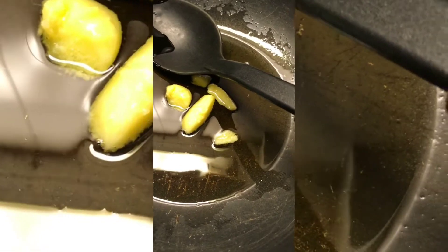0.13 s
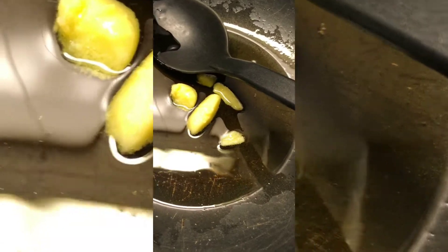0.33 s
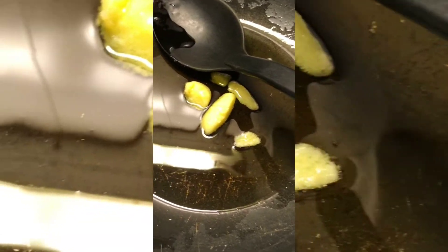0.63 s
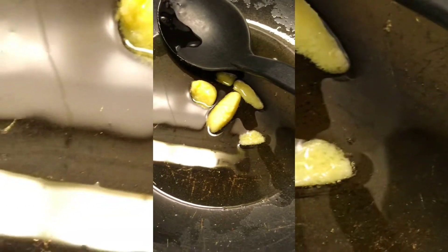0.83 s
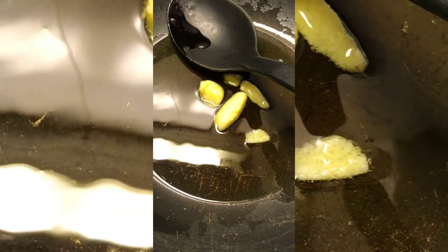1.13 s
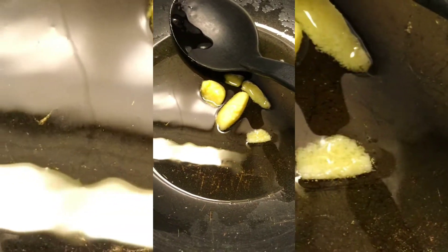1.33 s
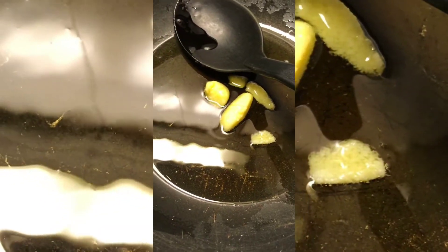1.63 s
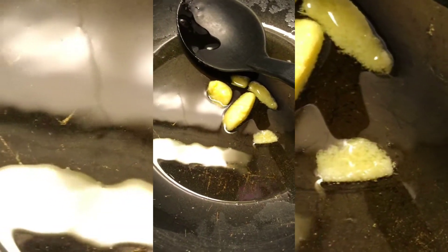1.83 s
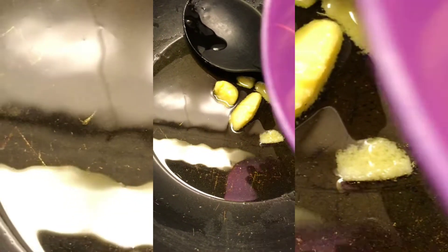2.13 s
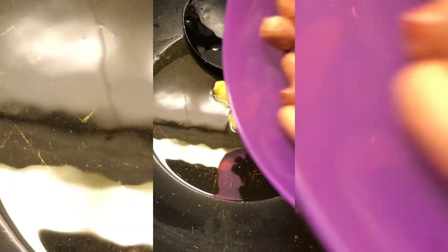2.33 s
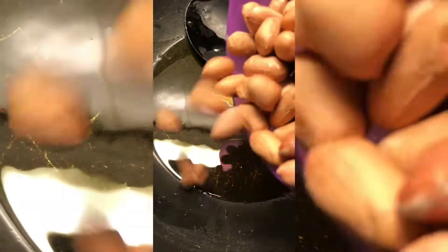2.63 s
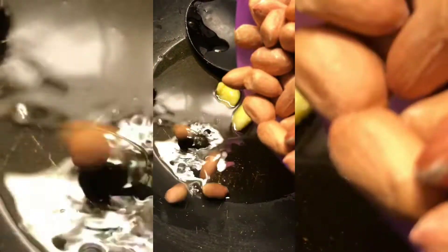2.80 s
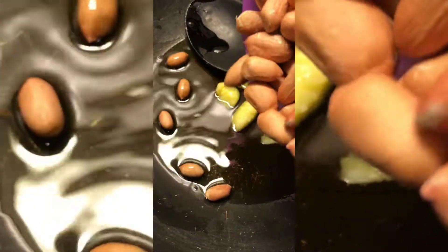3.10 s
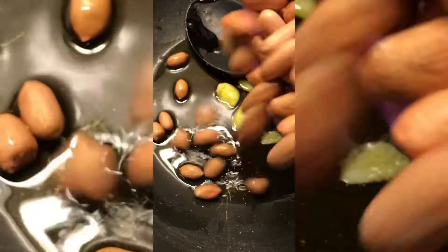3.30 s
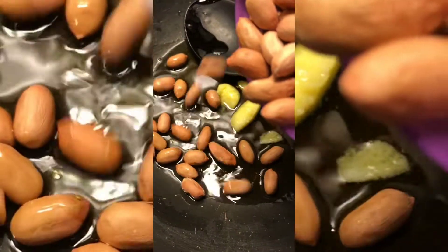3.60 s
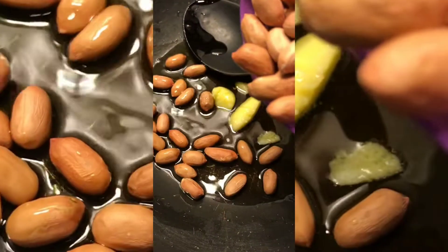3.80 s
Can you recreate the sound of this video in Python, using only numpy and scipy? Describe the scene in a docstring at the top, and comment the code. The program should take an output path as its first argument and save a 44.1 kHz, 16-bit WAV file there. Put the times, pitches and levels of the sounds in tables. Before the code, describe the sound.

Peanuts rattle sharply into a pan, a first scattered handful and then a denser one, after brief dry tumbling in a plastic bowl; faint butter crackle comes earlier, with constant low hum, close microphone, small room.

```python
"""Raw peanuts drop, in two handfuls, from a plastic bowl into a pan with a film of melted butter.
Each nut is a snap, a short noise knock, a clack and the decaying modes of pan or bowl, in a small kitchen.
Skins rustle in the bowl as dense filtered grains; a few very short high pings fall among the landings.
A low motor hum, sine lines in a rush of air, runs throughout.
Early on the butter gives a faint crackle of noise bursts, with a thin sizzle of narrow-band hiss."""
import sys
import numpy as np
from scipy import signal
from scipy.fft import rfft, irfft
from scipy.io import wavfile

SR = 44100
rng = np.random.default_rng(int(sys.argv[2]) if len(sys.argv) > 2 else 0)


def wav_out(sig):
    """Save sig, one row per channel (or a flat mono array), as 16-bit PCM at SR to the path in sys.argv[1]."""
    wavfile.write(sys.argv[1], SR, np.round(np.clip(np.atleast_2d(sig).T, -1, 1) * 32767).astype(np.int16))


N = 174195

# motor hum lines: pitch_hz, level_rms_db (before the waver)
HUM_LINES = [(99.8, -39.5), (46.3, -60.5), (135.2, -55.5), (213.3, -56)]
# spectrum of the motor's rush of air: frequency_hz, relative_level_db
AIR_COLOUR = [(22, -25), (38, -11), (52, -3), (90, 4.5), (140, 2.5), (168, -6.5), (210, -2.5), (260, -7.5),
              (350, -2), (420, -15.5), (490, -25), (635, -6), (740, -24), (930, -10), (1120, -19.5),
              (1350, -20), (2000, -27), (3200, -29.5), (4500, -38.5), (6000, -41), (7500, -46.5),
              (9000, -45), (10500, -49), (15500, -46.5)]
# sizzle swells: middle_s, length_s, centre_hz, rms_at_crest_db
SIZZLES = [(0.596, 1, 4760, -67.5), (.752, .35, 9200, -77)]
# butter crackles: start_s, onset_rms_db, t60_s
CRACKLES = [(.233, -37.5, 0.028), (0.2403, -38.5, 0.025), (0.2433, -36, 0.05), (0.2668, -42, 0.07),
            (0.2964, -42.5, 0.025), (0.3, -44.5, 0.076)]
# crackle spectrum: frequency_hz, relative_level_db
CRACKLE_COLOUR = [(700, 1), (1350, 15.5), (2000, 0), (3100, 8), (4600, 1), (5800, 11), (7500, 3), (9000, 6),
                  (10300, -1), (12000, 4), (15500, -2)]
# level of nuts rubbing in the bowl: time_s, level_db
RUSTLE_LEVEL = [(2.28, -69), (2.32, -47), (2.45, -40.5), (2.58, -39), (2.68, -48), (2.87, -68),
                (2.99, -43.5), (3.08, -55), (3.169, -54), (3.22, -46.5), (3.3, -47.5), (3.5, -61),
                (3.7, -45), (3.95, -61)]
# rustle spectrum: frequency_hz, relative_level_db
RUSTLE_COLOUR = [(480, -7), (1000, 8), (1600, -0.5), (2800, -8.5), (5000, -7.5), (7500, -18.5), (9000, -19),
                 (10400, -23), (12500, -19.5), (16000, -22)]
# four frequency registers: low_hz, high_hz
REGISTERS_HZ = [(500, 800), (850, 2800), (2800, 7500), (7500, 16500)]
# nominal decay of the knock of nut and vessel, one per register: t60_s
KNOCK_T60_S = [0.035, 0.021, 0.032, 0.041]
# nuts against the plastic bowl: start_s, thud_db, ring_db, clack_db, top_db, length_ratio (1 = free knock)
TUMBLES = [(2.3583, -50, -28.5, -44, -70, 0.2), (2.369, -42, -30.5, -57, -82, 0.75),
           (2.434, -44, -37, -49, -62, 0.63), (2.467, -32.5, -31.5, -44, -51, 1.4),
           (2.4884, -26.5, -21, -17.5, -34, 0.8), (2.511, -36, -35, -34, -56, 0.69),
           (2.5454, -40, -26, -27.5, -47, 0.53), (2.5486, -24.5, -22, -28, -39.5, 0.43),
           (2.556, -37, -25.5, -29.5, -45, 1.3), (2.577, -33, -28, -32, -47, 0.51),
           (2.586, -30, -29, -37, -59, 0.47), (2.5979, -30, -26.5, -29, -43, 0.73),
           (2.6016, -40, -26, -32, -58, 1.2), (2.618, -33, -25.5, -31.5, -49, 0.89),
           (2.641, -32, -27, -31.5, -47, 0.69), (3.2359, -30.5, -22.5, -28.5, -43.5, 1.08),
           (3.324, -28, -20, -38, -55, 0.86)]
# bowl modes, nominal: pitch_hz, relative_level_db, t60_s
BOWL_MODES = [(673, 2.5, 0.042), (952.4, 2.5, 0.065), (1050, -9, 0.11), (1240, -5, 0.032),
              (1700, -4.5, 0.016), (2290, 1, 0.019), (3380, -13.5, 0.062), (3970, -16, 0.021)]
# bowl knock spectrum, nominal: frequency_hz, relative_level_db
BOWL_COLOUR = [(470, -5), (650, 0.5), (1100, 10), (1600, -4), (2600, -2.5), (4100, 0), (7500, -15.5),
               (9000, -20), (10500, -26), (15000, -49)]
# nuts into the pan: start_s, thud_db, ring_db, clack_db, top_db, clack_hz
LANDINGS = [(2.7083, -26.5, -21.5, -17, -30, 3975), (2.7415, -31.5, -35, -46, -47, 4300),
            (2.7593, -23.5, -11.5, -13.5, -23.5, 4160), (2.777, -39, -29, -51, -59, 2870),
            (2.8163, -26, -15.5, -20.5, -38, 4010), (2.827, -39, -49, -20.5, -47, 4000),
            (2.848, -50, -10, -14, -39, 3500), (2.8645, -47, -39, -32, -35, 5740),
            (2.882, -32, -45, -29, -37.5, 5200), (2.913, -31.5, -32, -25, -39.5, 5100),
            (2.9295, -34, -21.5, -21.5, -60, 4030), (2.963, -35.5, -55, -39, -41.5, 4560),
            (2.986, -39, -33, -33.5, -57, 4100), (3.3272, -45, -10, -15, -35, 4630),
            (3.333, -59, -13, -16.5, -32.5, 3160), (3.348, -39, -38, -35, -55, 3920),
            (3.368, -39, -10.5, -16, -34, 5670), (3.375, -44, -18, -17.5, -33, 5880),
            (3.386, -49, -24.5, -25, -52, 2600), (3.3977, -31, -10, -19, -38, 3280),
            (3.4316, -34, -13.5, -24.5, -35, 2840), (3.4685, -33.5, -38, -24, -30, 5600),
            (3.482, -45, -55, -31, -50, 5660), (3.497, -45, -27, -24, -33, 6270),
            (3.5003, -31, -9.5, -14.5, -30, 5460), (3.5097, -41, -9, -13, -31.5, 3300),
            (3.5215, -36, -16.5, -24.5, -47, 2770), (3.563, -58, -25, -38, -63, 2230),
            (3.5772, -45, -23, -24, -35, 4140), (3.59, -56, -31, -38, -56, 2410),
            (3.6108, -55, -24, -22.5, -42, 3970), (3.6535, -46, -24, -26, -35, 3970),
            (3.6828, -47, -25, -39.5, -67, 2980), (3.7155, -44, -20.5, -30.5, -61, 3030),
            (3.7651, -43, -17, -24.5, -62, 1230), (3.775, -36, -19.5, -31, -66, 2720)]
# pan modes, nominal: pitch_hz, relative_level_db, t60_s
PAN_MODES = [(631, -4, 0.055), (998.4, -16.5, 0.092), (1060, -18.5, 0.06), (1194, -4.5, 0.052),
             (1693, -2, 0.043), (1784, 3.5, 0.041), (2180, -6.5, 0.024), (2278, -13, 0.046),
             (2584, -11, 0.074), (2844, -10.5, 0.035), (3425, -13.5, 0.073), (4006, -5.5, 0.034),
             (4380, -2, 0.017), (5844, -6, 0.022)]
# pan knock spectrum, nominal: frequency_hz, relative_level_db
PAN_COLOUR = [(470, -8.5), (630, -0.5), (820, -29), (1200, 2.5), (1400, -5), (1750, 4), (2300, 3),
              (3400, 2.5), (4900, -3), (5800, -9), (7000, -10), (7700, -18.5), (9000, -9.5), (10400, -25.5),
              (12000, -18.5), (15000, -24)]
# short high pings: start_s, pitch_hz, peak_db
PINGS = [(2.7154, 12000, -13.5), (3.3978, 14750, -11.5), (3.469, 14200, -8)]

AIR_RMS_DB, HUM_WAVER_RMS, HUM_WAVER_HZ = -38.5, 0.3, 8
SIZZLE_WIDTH_HZ = 1600
GRAINS_PER_S, FLICKER_RMS_DB, FLICKER_HZ = 4000, 2.5, 60

# parts of a strike, relative to each other; the hit tables then set each register's level
SNAP_DB, KNOCK_DB, CLACK_DB = 16, 1, 4.5
CLACK_T60_S, BOWL_CLACK_HZ = 0.015, 3890  # T60 at length_ratio 1
STRIKE_S = 0.008  # a hit's register levels are the rms deviation over this first stretch
# random spread from hit to hit
MODE_SPREAD_DB, BODY_SPREAD_DB, DETUNE_RATIO, DAMPING_SPREAD_LOG = 2.5, 2, 0.013, 0.2
# as nuts pile up, the pan's modes sink by this share per second
LOADED_FROM_S, SAG_PER_S = 3.45, 0.13
# dull early echo off a nearby surface; its path changes with the spot struck
ECHO_S, ECHO_SPREAD_S, ECHO_CUT_HZ = 0.00277, 0.000416, 5800
PAN_ECHO_DB, BOWL_ECHO_DB = -7.5, -13.5  # before the dulling filter
PING_T60_S = 0.0014

KITCHEN_LOW_T60_S, KITCHEN_TREBLE_T60_S = 0.35, 0.14
KITCHEN_LOW_DB, KITCHEN_TREBLE_DB = -12, -15  # before the split filter
KITCHEN_SPLIT_HZ, KITCHEN_BUILD_S = 2470, 0.0036
CLIP_TOP, CUTOFF_HZ = 0.97, 16000


def from_db(db):
    """Decibels to gain."""
    return 10 ** (np.asarray(db) / 20)


def rms_one(x):
    """Scale to rms 1."""
    return x / np.sqrt(np.mean(x ** 2) + 1e-20)


def spectrum_gain(points, size):
    """Gain per FFT bin, interpolated over log frequency from (Hz, dB) points."""
    hz, db = np.transpose(points)
    bins_hz = np.maximum(np.fft.rfftfreq(size, 1 / SR), 1)
    return from_db(np.interp(np.log(bins_hz), np.log(hz), db))


def coloured(x, points):
    """Give a noise the spectrum of (Hz, dB) points; rms 1."""
    return rms_one(irfft(rfft(x) * spectrum_gain(points, len(x)), len(x)))


def passed(x, hz, kind, order=3):
    """Butterworth filter."""
    return signal.sosfilt(signal.butter(order, hz, kind, fs=SR, output="sos"), x)


def dying(t, t60_s):
    """Exponential decay, 60 dB in t60_s."""
    return np.exp(-np.log(1000) * t / t60_s)


def add(out, start_s, sound):
    """Mix a sound in at start_s."""
    i = int(start_s * SR)
    out[i:i + len(sound)] += sound[:len(out) - i]


def slow(hz):
    """Random wander up to about hz; rms 1."""
    return rms_one(passed(rng.standard_normal(N), hz, "low", order=2))


def motor():
    """Slightly wavering hum lines in a steady rush of air."""
    t = np.arange(N) / SR
    out = from_db(AIR_RMS_DB) * coloured(rng.standard_normal(N), AIR_COLOUR)
    for hz, rms_db in HUM_LINES:
        waver = 1 + HUM_WAVER_RMS * slow(HUM_WAVER_HZ)
        line = np.sqrt(2) * np.sin(2 * np.pi * (hz * t + rng.random()))
        out += from_db(rms_db) * waver * line
    return out


def rustle():
    """Dry skins rub in dense tiny grains; each register catches and slips, flickering on its own."""
    t = np.arange(N) / SR
    hits = rng.random(N) < GRAINS_PER_S / SR
    grains = coloured(hits * rng.standard_normal(N), RUSTLE_COLOUR)
    scrape = np.zeros(N)
    for band_hz in REGISTERS_HZ:
        flicker = from_db(FLICKER_RMS_DB * slow(FLICKER_HZ))
        scrape += passed(grains, band_hz, "band") * flicker
    level_db = np.interp(t, *np.transpose(RUSTLE_LEVEL))
    return rms_one(scrape) * from_db(level_db)


def sizzle():
    """Narrow bands of hiss swell and fade."""
    out, t = np.zeros(N), np.arange(N) / SR
    for middle_s, length_s, hz, rms_db in SIZZLES:
        swell = np.cos(np.pi * np.clip((t - middle_s) / length_s, -0.5, 0.5))
        band_hz = (hz - SIZZLE_WIDTH_HZ / 2, hz + SIZZLE_WIDTH_HZ / 2)
        hiss = rms_one(passed(rng.standard_normal(N), band_hz, "band", order=2))
        out += from_db(rms_db) * swell * hiss
    return out


def butter_crackle():
    """A few tiny bright noise bursts, each decaying exponentially."""
    out, t = np.zeros(N), np.arange(SR // 10) / SR
    for start_s, db, t60_s in CRACKLES:
        burst = coloured(rng.standard_normal(len(t)), CRACKLE_COLOUR)
        add(out, start_s, from_db(db) * dying(t, t60_s) * burst)
    return out


def click(points, size):
    """The sharpest causal (minimum-phase) pulse with the spectrum of (Hz, dB) points; energy 1."""
    cepstrum = irfft(np.log(spectrum_gain(points, size)), size)
    folded = 2 * cepstrum[:size // 2]  # causal half only: minimum phase
    pulse = irfft(np.exp(rfft(folded, size)), size)
    return pulse / np.linalg.norm(pulse)


def vessel_ring(t, modes, length_ratio, tuning_ratio):
    """Sum of the vessel's damped modes; a new spot changes their sign, strength, pitch and damping."""
    hz, mode_db, t60_s = np.transpose(modes)[:, :, None]
    sign, force, detune, damping = rng.standard_normal((4, len(modes), 1))
    strength = np.sign(sign) * from_db(mode_db + MODE_SPREAD_DB * force)
    decay = dying(t, length_ratio * t60_s * np.exp(DAMPING_SPREAD_LOG * damping))
    mode_hz = tuning_ratio * hz * (1 + DETUNE_RATIO * detune)
    return (strength * decay * np.sin(2 * np.pi * mode_hz * t)).sum(axis=0)


def echoed(x, lag_s, db):
    """Add one dull reflection."""
    i = np.arange(len(x))
    late = np.interp(i - lag_s * SR, i, x, left=0)
    return x + from_db(db) * passed(late, ECHO_CUT_HZ, "low", order=1)


def knocks(hits, modes, colour, echo_db):
    """Each hit is snap, knock, clack and vessel modes; the contact sets each register's level."""
    out, t = np.zeros(N), np.arange(SR // 5) / SR
    snap = from_db(SNAP_DB) * click(colour, len(t))
    for start_s, *levels_db, clack_hz, length_ratio, tuning_ratio in hits:
        ring = vessel_ring(t, modes, length_ratio, tuning_ratio)
        # brightest partial: depends on the nut and where it strikes
        clack = dying(t, length_ratio * CLACK_T60_S) * np.sin(2 * np.pi * clack_hz * t)
        tone = snap + ring + from_db(CLACK_DB) * clack
        # every nut colours its knock in its own way
        body = [(hz, db + BODY_SPREAD_DB * rng.standard_normal()) for hz, db in colour]
        knock = from_db(KNOCK_DB) * coloured(rng.standard_normal(len(t)), body)
        lag_s = ECHO_S + ECHO_SPREAD_S * rng.standard_normal()
        for band_hz, db, t60_s in zip(REGISTERS_HZ, levels_db, KNOCK_T60_S):
            strike = tone + knock * dying(t, length_ratio * t60_s)
            part = passed(echoed(strike, lag_s, echo_db), band_hz, "band")
            add(out, start_s, from_db(db) * part / np.std(part[:int(STRIKE_S * SR)]))
    return out


def bowl_tumbles():
    """Nuts knock the plastic bowl, whose modes keep their nominal tuning."""
    hits = [(*row, BOWL_CLACK_HZ, length_ratio, 1) for *row, length_ratio in TUMBLES]
    return knocks(hits, BOWL_MODES, BOWL_COLOUR, BOWL_ECHO_DB)


def pan_landings():
    """Nuts knock the pan, whose modes sink as the load grows."""
    hits = []
    for row in LANDINGS:
        tuning_ratio = 1 - SAG_PER_S * max(row[0] - LOADED_FROM_S, 0)
        hits.append((*row, 1, tuning_ratio))
    return knocks(hits, PAN_MODES, PAN_COLOUR, PAN_ECHO_DB)


def pings():
    """High decaying sines, a few milliseconds at most."""
    out, t = np.zeros(N), np.arange(SR // 10) / SR
    for start_s, hz, peak_db in PINGS:
        add(out, start_s, from_db(peak_db) * dying(t, PING_T60_S) * np.sin(2 * np.pi * hz * t))
    return out


def kitchen(x):
    """Diffuse reflections build up within milliseconds; the treble dies sooner."""
    t = np.arange(SR // 2) / SR
    response = np.zeros(len(t))
    bands = (("low", KITCHEN_LOW_T60_S, KITCHEN_LOW_DB),
             ("high", KITCHEN_TREBLE_T60_S, KITCHEN_TREBLE_DB))
    for kind, t60_s, db in bands:
        build = 1 - np.exp(-t / KITCHEN_BUILD_S)
        tail = rng.standard_normal(len(t)) * dying(t, t60_s) * build
        tail /= np.linalg.norm(tail)
        response += from_db(db) * passed(tail, KITCHEN_SPLIT_HZ, kind, order=2)
    return signal.fftconvolve(x, response)[:N]


def scene():
    """Pan and bowl close by, the room around them, sizzle and hum without room."""
    pan = pan_landings() + pings() + butter_crackle()
    bowl = bowl_tumbles() + rustle()
    close = pan + bowl
    return (close + kitchen(close) + sizzle() + motor())[None]


def record(dry):
    """Soft clipping rounds off the loudest knocks; an elliptic low-pass cuts the top."""
    rounded = dry / (1 + (dry / CLIP_TOP) ** 4) ** (1 / 4)
    low_pass = signal.ellip(10, 0.1, 90, CUTOFF_HZ, fs=SR, output="sos")
    return signal.sosfilt(low_pass, rounded)


dry = scene()
out = record(dry)
wav_out(out)
```